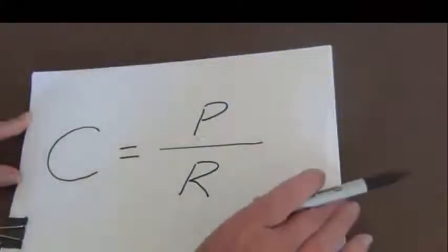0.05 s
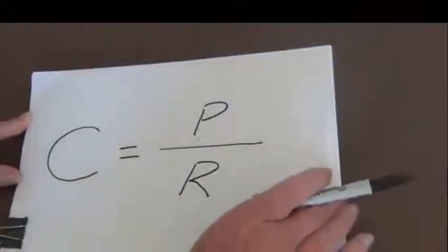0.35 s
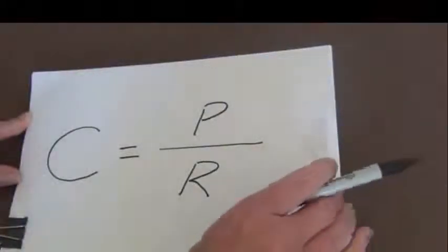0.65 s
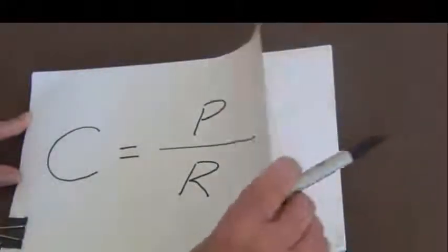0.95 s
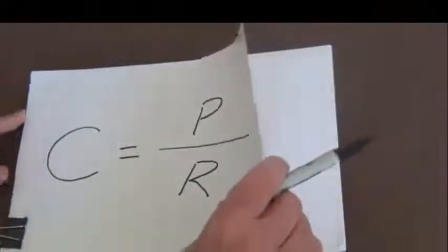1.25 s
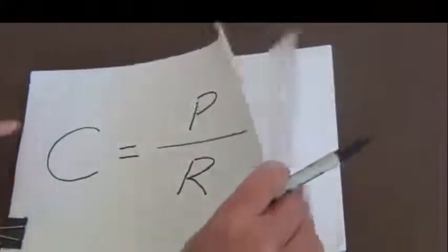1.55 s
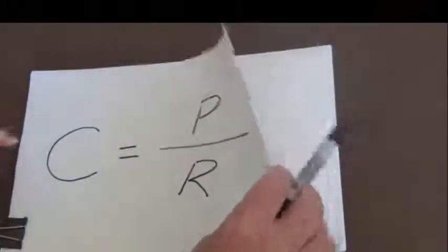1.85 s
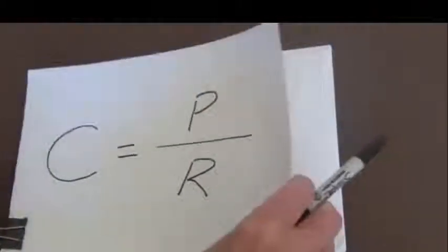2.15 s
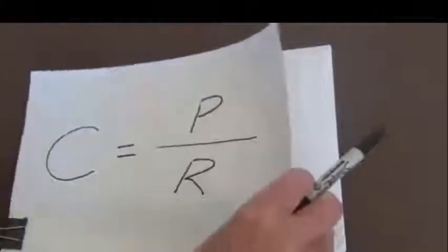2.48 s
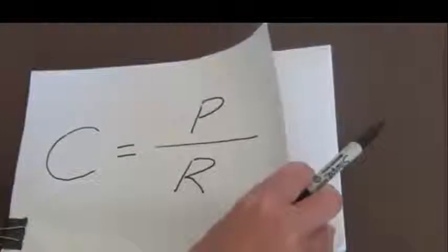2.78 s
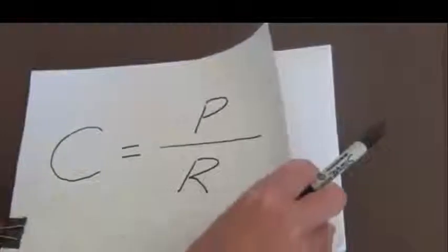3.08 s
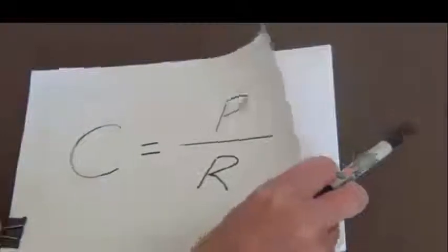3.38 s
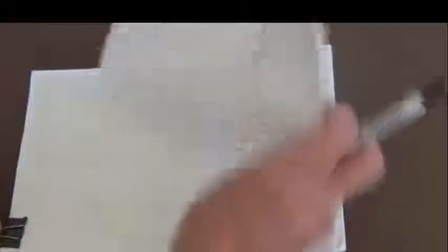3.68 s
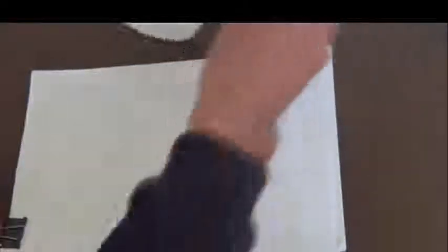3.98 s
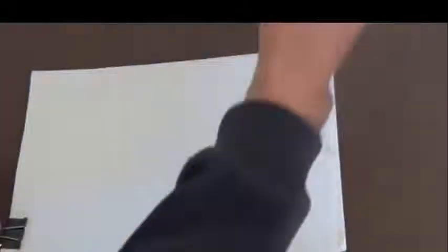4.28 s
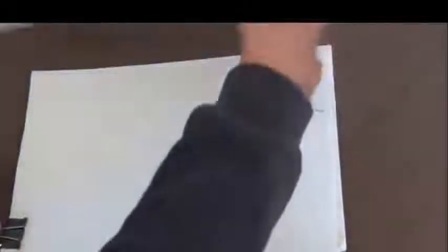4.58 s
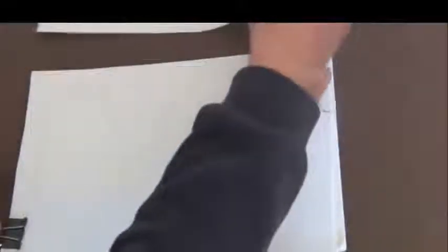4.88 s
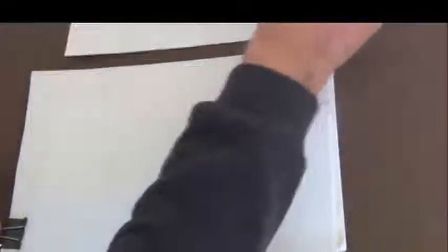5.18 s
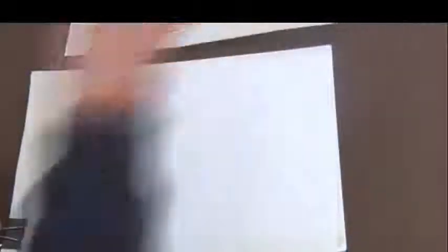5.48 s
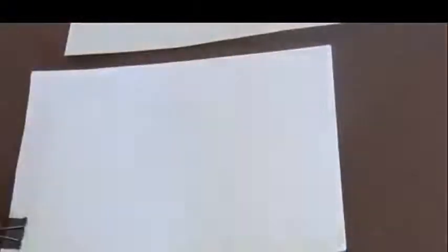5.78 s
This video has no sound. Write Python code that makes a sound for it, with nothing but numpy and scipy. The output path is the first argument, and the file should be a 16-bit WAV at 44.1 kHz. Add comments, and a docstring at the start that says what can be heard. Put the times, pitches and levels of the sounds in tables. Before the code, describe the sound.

Faint steady noise fills a small room, with slight finger touches on paper close to the microphone. From about 1.4 to 2 seconds a sheet is curled up off its stack with a soft hiss, rustle, faint squeak and a small snap. Light ticks and dull taps follow until about 2.8 seconds. From 3.2 to 4 seconds the sheet is drawn away in a longer rubbing slide, while hand and sleeve brush the pad. Between 4 and 4.6 seconds comes the loudest part: the sheet swings over, buckling and crackling, with a sharp snap and dull knock at 4.2 and another crack near 4.5 as it lands. The tabletop rings faintly. A softer knock comes at 4.8 seconds. From 5.2 to 5.6 the sheet is nudged into place with a short hiss, a click and a soft puff of air, then faint brushing fades.

```python
"""A sheet of paper is curled up off its stack by hand, drawn away, swung over and laid on the table.
It hisses and squeaks as it rubs, buckles and snaps as it bends; hand and sleeve brush the pad.
There are dull knocks, soft hand thumps and a puff of air, and the table top rings faintly.
The place is a small room with a faint steady noise; the microphone is close, the image almost mono."""
import sys
import numpy as np
from scipy import signal
from scipy.fft import rfft, irfft
from scipy.io import wavfile
from scipy.ndimage import uniform_filter1d

SR = 44100
rng = np.random.default_rng(int(sys.argv[2]) if len(sys.argv) > 2 else 0)


def materialize(psi):
    """Save the field psi as 16-bit PCM at rate SR to the path in sys.argv[1].

    A 1-D psi becomes a single channel; in a 2-D psi each row is a channel.
    """
    bounded = np.clip(np.atleast_2d(psi).T, -1, 1)
    quanta = np.round(bounded * 32767).astype(np.int16)
    wavfile.write(sys.argv[1], SR, quanta)


N = 262130
TIME = np.arange(N) / SR
FREQ = np.maximum(np.fft.rfftfreq(N, 1 / SR), 1)


def undb(db):
    """Decibels to gain."""
    return 10 ** (np.asarray(db) / 20)


def unit(x):
    """Scale to rms 1."""
    return x / np.sqrt(np.mean(x ** 2))


def colour(x, points):
    """Equalise a sound along a curve of (Hz, dB) points."""
    hz, db = np.transpose(points)
    return irfft(rfft(x) * undb(np.interp(np.log(FREQ), np.log(hz), db)), N)


def around(hz, octaves):
    """Edges of a band about its centre."""
    return hz / 2 ** (octaves / 2), hz * 2 ** (octaves / 2)


def band(x, low_hz, high_hz, order=2):
    """Causal band-pass."""
    edges = [low_hz, np.clip(high_hz, low_hz + 50, SR / 2 - 500)]
    return signal.sosfilt(signal.butter(order, edges, "band", fs=SR, output="sos"), x)


def ring(x, hz, width_hz):
    """One resonance, gain 1 at its centre."""
    return signal.lfilter(*signal.iirpeak(hz, hz / width_hz, fs=SR), x)


def walk(per_s):
    """Smooth random wander, rms 1."""
    hold = int(SR / per_s)
    steps = np.repeat(rng.standard_normal(N // hold + 1), hold)
    return unit(uniform_filter1d(steps, hold)[:N])


def slips(per_s, spread_db):
    """Fibres catch and let go: dense clicks of uneven size."""
    size = undb(spread_db * np.minimum(rng.exponential(size=N), 4))
    return unit((rng.random(N) < per_s / SR) * size * rng.choice([-1, 1], N))


def stroke(start, length, attack_s=0.025, release_s=0.046):
    """A light stroke swells, holds while the hand moves and dies away."""
    swell = np.clip((TIME - start) / attack_s, 0, 1)
    return swell * np.exp(-np.maximum(TIME - start - length, 0) / release_s)


def handling():
    """Strength of hiss, rustle and brushing over time: moves and strokes add in power."""
    # The sheet's four moves. Each row: time in seconds, relative levels of hiss and rustle in dB.
    curl = [(1.41, -52, -50.5), (1.505, -51, -47), (1.535, -37.5, -41), (1.58, -41.5, -41),
            (1.64, -37, -37.5), (1.77, -34.5, -36), (1.88, -41.5, -36.5), (1.965, -37, -44),
            (2.04, -70, -51)]  # the corner is curled up off the pad
    draw = [(3.13, -66, -64), (3.25, -55, -47), (3.285, -50, -37.5), (3.385, -49.5, -42),
            (3.43, -40.5, -37.5), (3.62, -41, -40), (3.78, -40, -47.5), (3.865, -38, -45), (3.95, -58, -56)]  # the sheet is drawn off the stack
    swing = [(4.039, -66, -46), (4.104, -52.5, -38.5), (4.148, -22, -19), (4.206, -38, -32.5),
             (4.3, -37.5, -32.5), (4.4, -33.5, -47.5), (4.49, -46, -27), (4.57, -67, -42),
             (4.68, -53.5, -53)]  # it swings over and lands
    nudge = [(5.15, -58.5, -68.5), (5.26, -47, -56.5), (5.325, -53, -59), (5.39, -43, -47),
             (5.497, -40, -36), (5.559, -76, -56)]  # it is nudged into place and let go
    # Fingers shift on the paper.
    # Each row: start and length in seconds, relative levels of hiss and rustle in dB.
    touches = [(0, 0.4, -70, -65.5), (1.031, 0.072, -53.5, -51.5), (1.155, 0.024, -57.5, -51),
               (1.254, 0.046, -50, -48.5), (1.353, 0.15, -56, -52), (2.02, .04, -68, -58),
               (2.104, 0.051, -56.5, -52.5), (2.202, .11, -56.5, -50.5), (2.367, 0.12, -62, -53.5),
               (2.662, 0.21, -66, -63.5), (3.939, 0.063, -51, -52), (4.672, 0.13, -58, -55),
               (4.874, 0.12, -65, -59.5), (4.976, 0.15, -53, -50.5), (5.56, 0.41, -64.5, -60.5)]
    # Hand and sleeve brush the pad. Each row: start and length in seconds, relative level in dB.
    brushes = [(0.034, 0.028, -59.5), (1.053, 0.043, -59), (1.235, 0.076, -57), (1.41, 0.64, -60),
               (1.597, 0.026, -59), (1.748, .03, -56), (1.835, 0.029, -49), (2.22, 0.07, -52),
               (2.487, 0.18, -58), (3.24, 0.76, -57.5), (3.92, 0.23, -49.5), (4.116, 0.046, -32.5),
               (4.262, 0.23, -47.5), (4.535, 0.11, -40), (4.687, 0.031, -48), (4.968, 0.085, -56),
               (5.218, 0.17, -62), (5.382, 0.15, -51), (5.678, 0.24, -53.5)]
    paper_power = np.zeros((2, N))
    for move in (curl, draw, swing, nudge):
        times, *levels = np.transpose(move)
        moving = (TIME >= times[0]) & (TIME < times[-1])
        paper_power += undb([np.interp(TIME, times, db) for db in levels]) ** 2 * moving
    for start, length, hiss_db, rustle_db in touches:
        paper_power += np.outer(undb([hiss_db, rustle_db]), stroke(start, length)) ** 2
    pad_power = sum((undb(db) * stroke(start, length)) ** 2 for start, length, db in brushes)
    return np.sqrt([*paper_power, pad_power])


def sliding(flicker_db=3.0):
    """Slips excite the sheet's face, its bending waves and the pad; the grip wavers for all three."""
    # Tone of the rubbed face, flexing sheet and brushed pad. Each row: frequency in Hz, gain in dB.
    hiss_tone = [(700, 2.5), (1500, -15), (2400, 1), (3200, 6), (4600, 4.5), (5800, 2.5), (7500, -1.5),
                 (9400, -0.5), (11000, -4.5)]
    rustle_tone = [(250, -35), (550, -7), (900, -0.5), (1250, 0.5), (1700, 0), (2200, -1.5), (3000, -5),
                   (4500, -10), (9000, -39)]
    brush_tone = [(25, -4), (60, -16.5), (120, -4.5), (180, -4.5), (260, 3.5), (420, 4.5), (600, -0.5),
                  (1000, -0.5), (3000, -32.5)]
    rubbing, flexing, brushing = handling()
    grip = walk(per_s=70)
    fibres = slips(per_s=14000, spread_db=2.0)
    crinkles = undb(-6.0) * slips(per_s=220, spread_db=3.5)
    # The patch of contact keeps shifting, so each part of the treble comes and goes.
    edges_hz = np.geomspace(1000, 12000, 9)
    face = np.zeros(N)
    for k, (low, high) in enumerate(zip(edges_hz, edges_hz[1:])):
        flicker = undb(flicker_db * walk(per_s=35))
        face += (-1) ** k * band(fibres + crinkles, low, high, order=3) * flicker
    hiss = unit(colour(face, hiss_tone))
    rustle = unit(colour(slips(per_s=6000, spread_db=1.5), rustle_tone))
    brush = unit(colour(slips(per_s=1200, spread_db=-3.0), brush_tone))
    return (hiss * rubbing * undb(0.28 * grip - 1.75)
            + rustle * flexing * undb(0.46 * grip - 4.0)
            + brush * brushing * undb(2.73 * grip - 2.5))


def room_tone(level_db=-62.04):
    """The room's steady noise, with a few faint whining bands in the centre of the image."""
    # Tone of the noise. Each row: frequency in Hz, gain in dB.
    noise_tone = [(15, -41), (25, -5.5), (160, -1.5), (197, -4.5), (381, -10), (651, 0), (703, 0),
                  (1230, -1.5), (1550, -6.5), (2580, -12.5), (2780, -11), (3160, -11.5), (6120, -16.5),
                  (6610, -16.5), (11000, -17.5), (14300, -64), (22000, -120)]
    # Narrow whines. Each row: centre and width in Hz, level in dB.
    whines = [(1160, 49, -69.5), (1748, 34, -72), (2570, 25, -76)]
    # How much of the noise comes from the sides. Each row: frequency in Hz, side gain in dB.
    side_tone = [(100, -29), (400, -13), (1000, -8.5), (1900, 6), (3000, -7.5), (4500, -19), (6500, -27)]
    mid, side = (unit(colour(rng.standard_normal(N), noise_tone)) * undb(level_db + 0.14 * walk(8.1))
                 for _ in range(2))
    for hz, width, db in whines:
        mid += undb(db) * unit(ring(rng.standard_normal(N), hz, width))
    side = colour(side, side_tone)
    return np.array([mid + side, mid - side])


def pop(start, db, hz, decay_s, octaves, edge_db, rise_s=0.00044):
    """A sudden push that crackles on; a thin broad edge rides on the main band."""
    out = np.zeros(N + SR)
    t = np.arange(SR // 10) / SR
    force = rng.standard_normal(len(t)) * np.exp(-t / decay_s) * (1 - np.exp(-t / rise_s))
    body = band(force, *around(hz, octaves), order=3)
    edge = undb(edge_db) * band(force, *around(1.09 * hz, octaves=3.36))
    sound = body + edge
    first = int(start * SR)
    out[first:first + len(t)] = undb(db) * sound * np.sqrt(0.01 * SR / np.sum(sound ** 2))
    return out[:N]


def snaps():
    """Creases in the paper pop through, each at its own pitch."""
    # Each row: start in seconds, level over 10 ms in dB, centre in Hz, crackle decay in seconds.
    creases = [(0.023, -56, 4300, 0.012), (.065, -55, 1790, 0.0092), (.581, -62, 2230, 0.0034),
               (1.146, -55.5, 2300, 0.0043), (1.405, -43.5, 1160, 0.0055), (1.441, -35.5, 1740, 0.0016),
               (1.835, -33.5, 1100, 0.0034), (2.243, -37.5, 1620, 0.01), (2.248, -43.5, 4800, 0.008),
               (2.557, -55, 990, 0.0059), (2.578, -47, 1110, 0.0087), (2.782, -42.5, 2020, 0.01),
               (3.2, -41, 2860, 0.011), (4.1205, -22, 1580, 0.0093), (4.1414, -28.5, 5600, 0.0045),
               (4.2279, -11.5, 3850, 0.0069), (4.236, -28, 2970, .0014), (4.3283, -29.5, 5530, .0015),
               (4.4359, -25, 2540, 0.00065), (4.449, -25.5, 3200, 0.0016), (4.712, -52.5, 1800, 0.0066),
               (4.7815, -41, 1900, .004), (5.037, -49, 1900, 0.0041), (5.433, -36.5, 1570, .005),
               (5.868, -54.5, 2250, .006)]
    return sum(pop(start, db, hz, decay, octaves=1.56, edge_db=-7) for start, db, hz, decay in creases)


def squeaks():
    """The sheet's edge sings briefly as it drags: the slips keep to one resonance."""
    # Each row: time of the peak in seconds, level in dB, half length in seconds, pitch in Hz.
    drags = [(0.858, -63.5, 0.0071, 6650), (1.086, -56, 0.038, 1620), (1.282, -47, 0.0054, 4450),
             (1.71, -43, 0.044, 1910), (2.133, -54.5, 0.016, 4120), (2.264, -53, 0.035, 4660),
             (3.43, -54, 0.069, 4340), (3.457, -45.5, 0.075, 2150), (3.969, -45.5, 0.0059, 7850),
             (4.142, -17.5, 0.00083, 9680), (5.387, -48, 0.013, 6700)]
    out = np.zeros(N)
    for peak, db, half_length, hz in drags:
        width_hz = 0.13 * hz
        swell = np.exp(-0.5 * ((TIME - peak) / half_length) ** 2)
        singing = ring(ring(rng.standard_normal(N), hz, width_hz), hz, width_hz)
        out += undb(db) * swell * unit(singing)
    return out


def buckles_and_thumps():
    """Short swells of noise: the sheet buckling in the midrange, soft hand thumps and an air puff below."""
    # Each row: time of the peak in seconds, level in dB, half length in seconds, centre in Hz.
    swells = [(1.418, -48.5, .014, 445), (2.603, -41.5, 0.016, 920), (3.279, -59.5, 0.026, 270),
              (3.89, -39, 0.011, 1010), (3.974, -44.5, 0.006, 900), (4.064, -29, 0.0056, 950),
              (4.096, -30, 0.017, 880), (4.242, -41, 0.014, 115), (4.435, -31.5, 0.0057, 1360),
              (4.461, -19, 0.0066, 2120), (4.476, -35.5, 0.04, 460), (4.539, -26.5, 0.011, 1310),
              (4.599, -30.5, .01, 1120), (5.493, -39, 0.0093, 1900), (5.519, -52.5, 0.024, 175)]
    out = np.zeros(N)
    t = np.arange(-SR // 10, SR // 10) / SR
    for peak, db, half_length, hz in swells:
        swell = 1 / np.cosh(np.clip(t / half_length, -30, 30)) ** 1.1
        noise = band(rng.laplace(size=len(t)) * swell, *around(hz, octaves=1.62), order=3)
        first = int((peak + t[0]) * SR)
        out[first:first + len(t)] += undb(db) * noise * np.sqrt(2 * half_length * SR / np.sum(noise ** 2))
    return out


def knocks():
    """Hand or sheet knocks dully on the pad, which damps every blow alike."""
    # Each row: start in seconds, level over 10 ms in dB, centre in Hz.
    blows = [(1.843, -36, 415), (2.262, -42, 595), (2.784, -47.5, 614), (3.956, -40, 520), (4.23, -17, 703),
             (4.781, -29.5, 600)]
    return sum(pop(start, db, hz, decay_s=0.012, octaves=2.18, edge_db=-20.5) for start, db, hz in blows)


def table_ring(paper):
    """Sheet and table top ring along with the handling."""
    # Their resonances. Each row: centre and width in Hz, gain in dB.
    modes = [(258.5, 45, -10.5), (527.3, 38, -2.5), (738, 100, -23), (1310, 45, 0), (1687, 370, -1),
             (2060, 300, -12.5), (2340, 360, -9.5), (2980, 260, -10.5), (4555, 60, -21), (9920, 180, -20.5)]
    return sum(undb(db) * ring(paper, hz, width) for hz, width, db in modes)


def reflections(x, t60_s, early_s, early_db):
    """One pattern of echoes: table and pad throw the sound straight back, the walls follow."""
    t = np.arange(SR // 2) / SR
    tail = undb(-60 * t / t60_s) * (1 - np.exp(-t / 0.0014))
    early = np.exp(-t / early_s) * (t > 0.001)
    response = rng.standard_normal(len(t)) * np.hypot(unit(tail), undb(early_db) * unit(early))
    return signal.fftconvolve(x, response / np.sqrt(np.sum(response ** 2)))[:N]


def room(x, direct_db=-1, wet_db=-7, patterns=3, moves_per_s=3):
    """The small room from close up: as the sheet moves, one echo pattern gives way to the next."""
    # Mostly treble reaches the microphone from the sides. Each row: frequency in Hz, side gain in dB.
    side_tone = [(200, -52), (600, -75.5), (1200, -40.5), (1900, -14), (3000, -16.5), (4400, -10),
                 (6000, -14.5), (8000, -20), (11000, -35)]
    mid = undb(direct_db) * x
    for k in range(patterns):
        away = np.abs((TIME * moves_per_s - k + patterns / 2) % patterns - patterns / 2)
        share = np.cos(np.pi / 2 * np.minimum(away, 1))
        mid += undb(wet_db) * reflections(x * share, t60_s=0.29, early_s=0.0077, early_db=-1.0)
    # The side walls answer for longer.
    side = colour(reflections(x, t60_s=0.41, early_s=0.012, early_db=3.5), side_tone)
    return np.array([mid + side, mid - side])


def scene():
    """Paper on a faintly ringing table, close to the microphone in a small room."""
    paper = sliding() + buckles_and_thumps() + snaps() + knocks() + squeaks()
    return room(paper + table_ring(paper)) + room_tone()


def record(dry, top_hz=10750):
    """The recorder rounds the loudest peaks and cuts the top."""
    low_pass = signal.ellip(10, 0.2, 70, top_hz, fs=SR, output="sos")
    return signal.sosfilt(low_pass, np.tanh(dry))


dry = scene()
out = record(dry)
materialize(out)
```